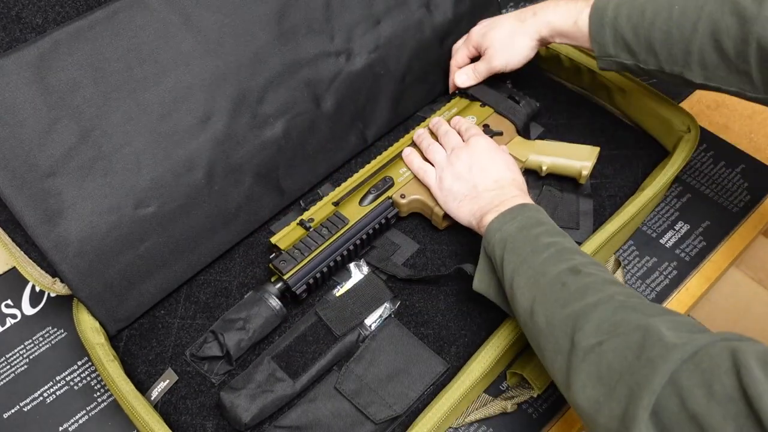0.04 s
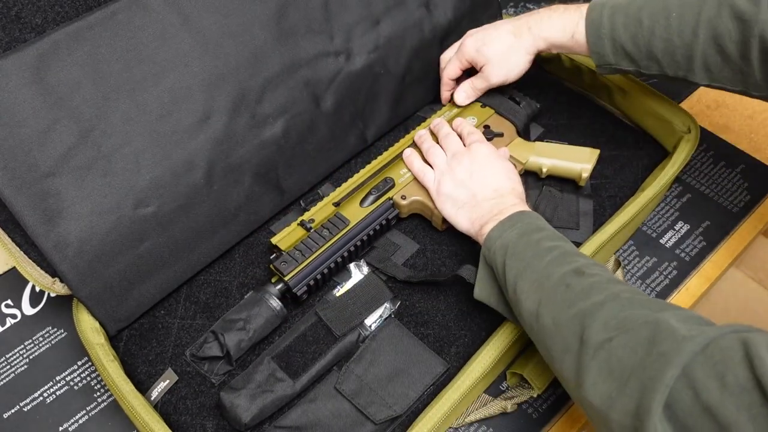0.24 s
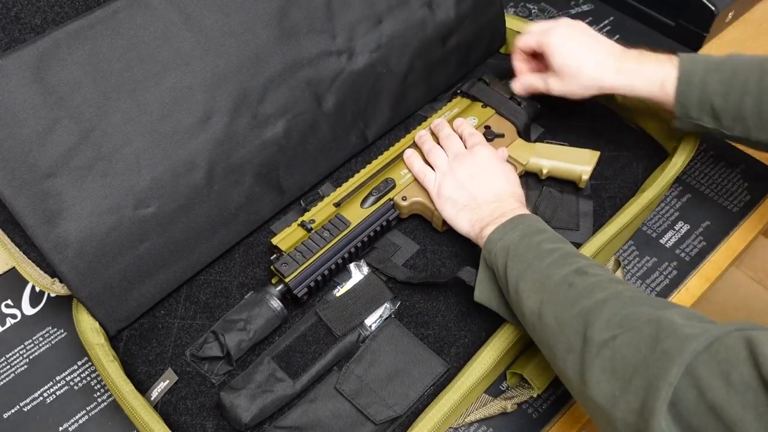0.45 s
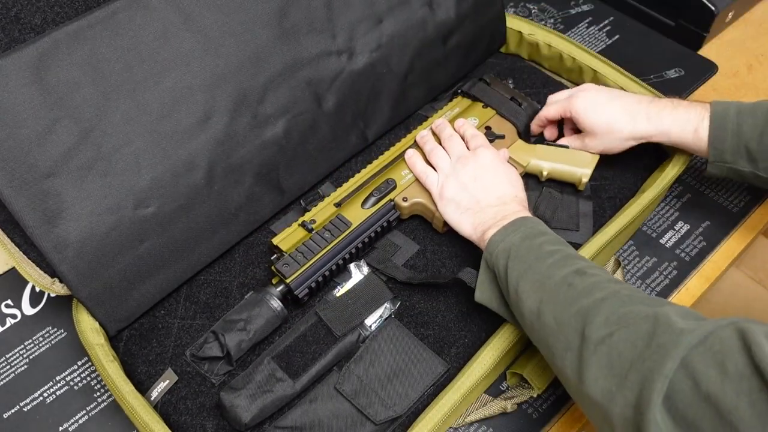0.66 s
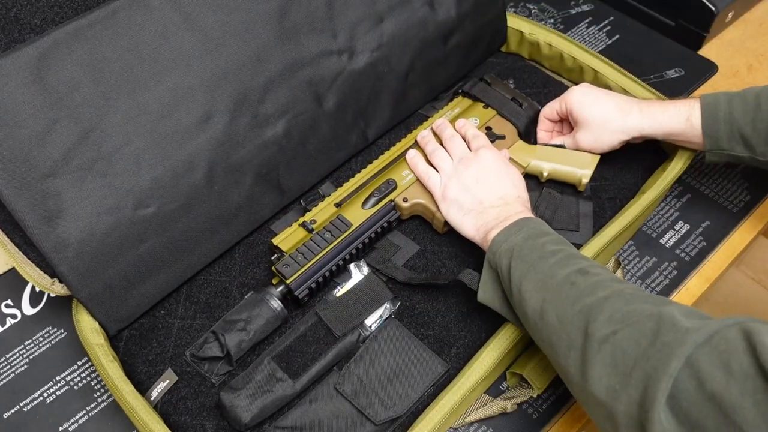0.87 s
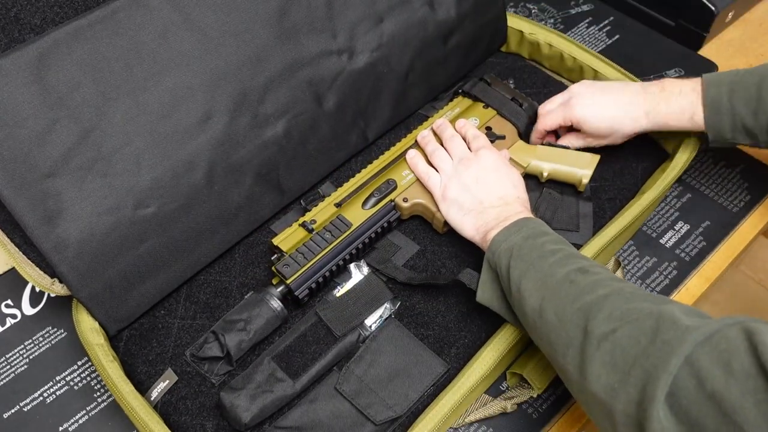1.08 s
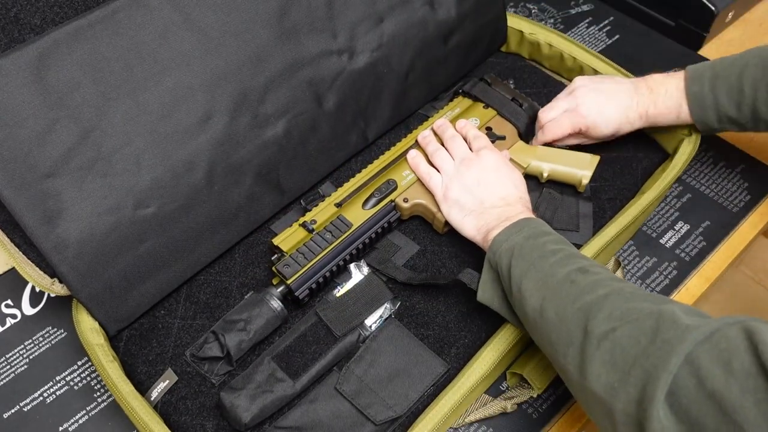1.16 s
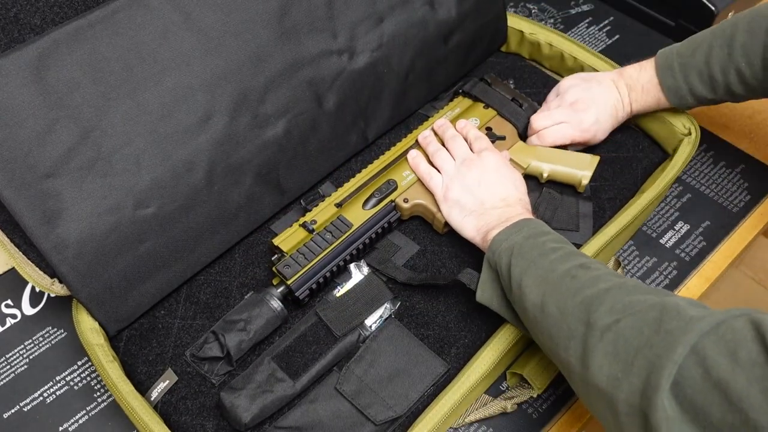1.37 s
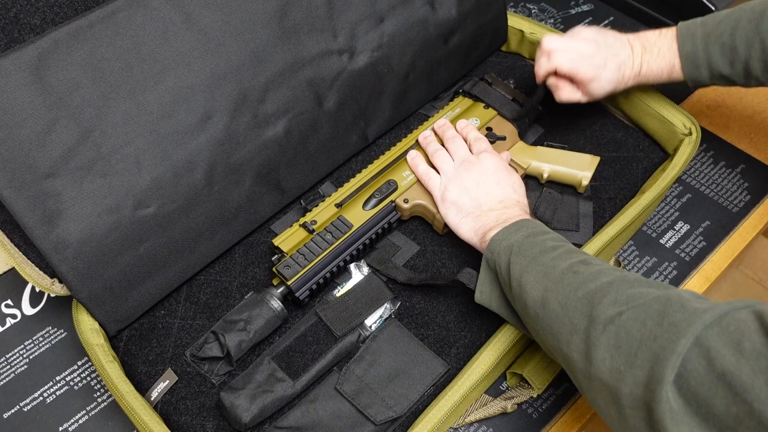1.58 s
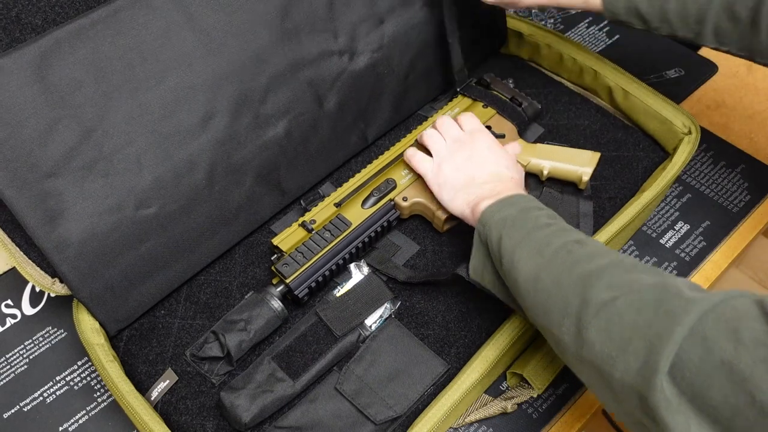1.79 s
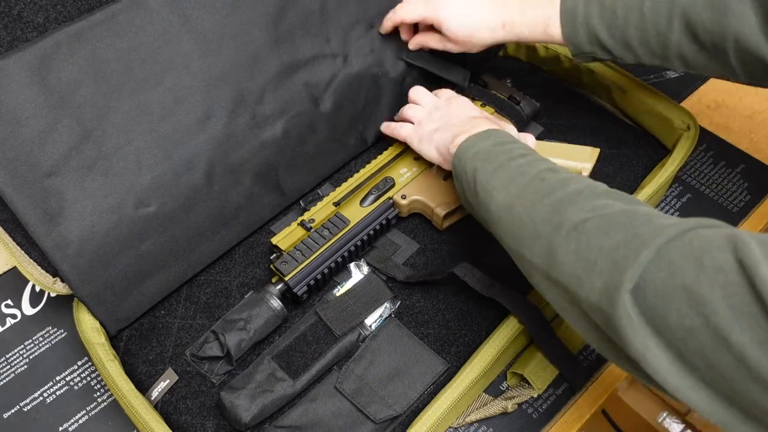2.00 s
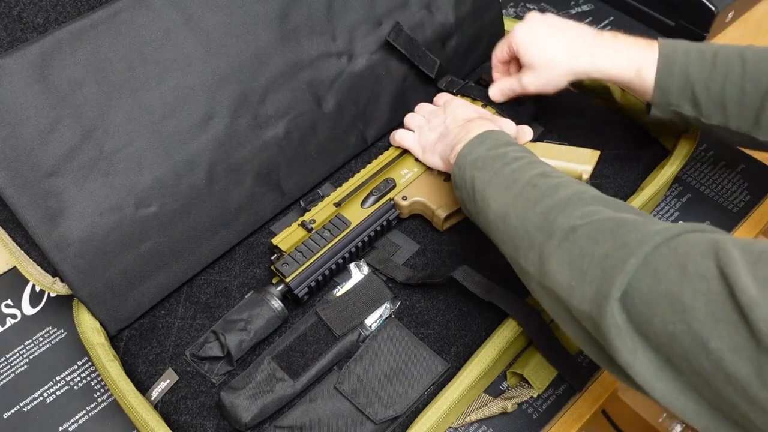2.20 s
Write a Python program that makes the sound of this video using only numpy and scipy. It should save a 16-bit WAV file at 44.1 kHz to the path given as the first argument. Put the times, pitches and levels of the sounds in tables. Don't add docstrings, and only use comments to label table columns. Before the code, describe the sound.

Close to a small camera indoors, hands tap and rub a padded nylon case, pull a hook-and-loop strap apart in uneven crunchy bursts, tear it loose loudly, then scrape the weave and rip again briefly.

```python
import sys
import numpy as np
from scipy import signal
from scipy.fft import rfft, irfft, next_fast_len
from scipy.io import wavfile
from scipy.ndimage import uniform_filter1d, map_coordinates

SR = 44100
rng = np.random.default_rng(int(sys.argv[2]) if len(sys.argv) > 2 else 0)


def linear_from_db(decibels):
    return 10 ** (np.asarray(decibels, float) / 20)


def pcm_store(signal):
    levels = np.round(np.clip(np.atleast_2d(signal), -1, 1) * 32767)
    wavfile.write(sys.argv[1], SR, levels.astype(np.int16).T)


N = 98960
T = np.arange(N) / SR

# (frequency [Hz], width [Hz], level [dB])
HOOKS = [(4120, 1960, 1), (6205, 1400, 0.5), (9480, 3400, -2.5), (13500, 2600, -9.5)]
# (frequency [Hz], width [Hz], level [dB])
PADDING = [(149, 100, -11.5), (396, 390, -3.5), (750, 474, 2), (1250, 330, -1), (1530, 690, 0),
           (2600, 2140, -19.5)]
# (time [s], rustle level [dB], padding rumble level [dB])
HANDLING = [(0, -52.5, -41.5), (.17, -39.5, -32.5), (.23, -39.5, -36.5), (.27, -50.5, -39),
            (.525, -51.5, -49), (.61, -61, -47), (.8, -47, -42.5), (.88, -36, -37), (1.0, -41.5, -53),
            (1.07, -41.5, -40.5), (1.18, -42, -37.5), (1.3, -43, -27), (1.4, -46, -49), (1.49, -42, -45),
            (1.72, -29, -32.5), (1.88, -46, -49.5), (2.03, -34.5, -34.5), (2.24, -56, -42)]
# (frequency [Hz], level per Hz [dB])
RUB = [(100, -17.5), (380, -0.5), (750, -4), (1400, -6.5), (2100, -16), (4500, -34)]


def unit(x):
    return x / np.sqrt(np.mean(x ** 2) + 1e-20)


def curve(rows, col):
    rows = np.array(rows)
    return np.interp(T, rows[:, 0], rows[:, col])


def wobble(count):
    return map_coordinates(rng.standard_normal(count * N // SR + 4), [T * count])


def filtered(x, response):
    m = next_fast_len(N + 8192)
    return irfft(rfft(x, m) * response(np.fft.rfftfreq(m, 1 / SR)), m)[:N]


def coloured(x, points):
    f, level = np.transpose(points)
    return unit(filtered(x, lambda hz: linear_from_db(np.interp(np.log(hz + 1), np.log(f), level))))


def grains(rate, spread_db):
    on = rng.random(N) < rate / SR
    size = linear_from_db(spread_db * np.minimum(rng.exponential(size=N), 3))
    return on * size * rng.standard_normal(N)


def ringing(clicks, body, scatter_db, burst_s):
    m = next_fast_len(N + 4096)
    f = np.fft.rfftfreq(m, 1 / SR)
    at = np.flatnonzero(clicks > 1e-6)
    luck, noise = rng.standard_normal((2, N + len(body)))
    total = 0
    for k, (centre, width, db) in enumerate(body):
        hit = np.zeros(N)
        hit[at] = clicks[at] * linear_from_db(scatter_db * luck[at + k])
        decay = signal.lfilter([1], [1, -np.exp(-1 / (burst_s * SR))], hit)
        burst = decay * np.roll(noise, 999 * k)[:N]
        damping = 1j * f * width
        mode = damping / (centre * centre - f * f + damping)
        total = total + rfft(burst, m) * linear_from_db(db) * mode ** 2
    return irfft(total, m)[:N]


def swell(start, rise, hold, fall):
    times = [0, rise / 2, rise, rise + hold,
             rise + hold + fall / 2, rise + hold + fall, rise + hold + 2 * fall]
    return np.interp(T - start, times, [0.0032, 0.19, 0.85, 1.0, 0.0, 0.043, 0.0029])


def evened(x):
    span_s = 0.0126
    power = np.abs(uniform_filter1d(x ** 2, size=round(span_s * SR)))
    return unit(x / (power + 0.07) ** 0.52)


def air():
    # (frequency [Hz], level per Hz [dB])
    hum = [(20, -8), (50, 5), (110, -7), (250, -1.5), (500, -40)]
    return linear_from_db(-53.5) * coloured(rng.standard_normal(N), hum)


def handling():
    # (frequency [Hz], level per Hz [dB])
    rustle = [(1500, -5), (2500, -2.5), (3500, -10), (5700, -2), (9500, -9), (16000, -10)]
    scratch = coloured(rng.standard_normal(N) + 1.1 * grains(1500, spread_db=4.5), rustle)
    rub = coloured(rng.standard_normal(N) + 3 * grains(240, spread_db=2.5), RUB)
    stir_db = 2.42 * wobble(count=35)
    scratch_db = curve(HANDLING, 1) + stir_db
    rub_db = curve(HANDLING, 2) + stir_db + 0.31 * wobble(count=60)
    return linear_from_db(scratch_db) * scratch + linear_from_db(rub_db) * rub


def snaps():
    # (time [s], peak level [dB])
    stray = [
        (0.032, -23),
        (0.157, -16.5),
        (0.3614, -23),
        (0.5953, -20),
        (1.925, -25),
    ]
    # (time [s], peak level [dB])
    broad = [(0.0904, -16), (0.6402, -15), (0.6496, -24), (0.6995, -30), (0.7196, -27), (0.7227, -26),
             (0.7268, -16), (0.7311, -18), (0.8471, -9.5), (0.851, -13), (0.8559, -32), (0.9273, -19),
             (0.9339, -12.5), (0.9393, -21), (0.9796, -16.5), (1.0639, -10.5), (1.0708, -16), (1.0813, -21),
             (1.0901, -7), (1.1208, -19), (1.1705, -18.5), (1.2048, -18), (1.2127, -9.5), (1.2537, -6),
             (1.2612, -16.5), (1.2692, -17), (1.2756, -8), (1.2924, -8.5), (1.297, -18), (1.308, -31),
             (1.3156, -21), (1.3242, -8), (1.3303, -14), (1.3393, -18), (1.3468, -29), (1.3535, -16),
             (1.3612, -10), (1.366, -10), (1.3782, -16.5), (1.4274, -18), (1.4322, -20), (1.4468, -22),
             (1.4779, -18), (1.4939, -27), (1.5078, -18), (1.5111, -16), (1.5307, -21), (1.5429, -10),
             (1.5554, -19), (1.5614, -10.5), (1.5673, -22), (1.5708, -24)]
    # (time [s], peak level [dB])
    edge = [(.8639, -10), (.8699, -9), (.9723, -13.5), (1.0121, -16), (1.0327, -16), (1.2144, -1.5),
            (1.2248, 4), (1.2354, 0.5), (1.2392, 0), (1.2536, -3.5), (1.2586, -8), (1.5946, -13),
            (1.5976, -7), (1.6054, 0), (1.6089, 6), (1.6164, 5), (2.0414, -10.5), (2.0467, -4.5),
            (2.0542, -22), (2.0645, -8.5), (2.0703, -14)]
    delay_s, snap_db = 0.00055, 6
    taut_from_s, taut_to_s, crackle_db, crackle_rate = 0.85, 1.7, 1, 450

    clear = np.zeros(N)
    for rows, modes in ((broad, HOOKS), (edge, HOOKS[2:]), (stray, HOOKS[1:2])):
        train = np.zeros(N)
        for s, db in rows:
            train[round((s + delay_s) * SR)] = linear_from_db(db + snap_db)
        clear = clear + ringing(train, modes, scatter_db=0.0, burst_s=0.00062)
    taut = (T > taut_from_s) & (T < taut_to_s)
    clicks = np.abs(grains(crackle_rate, spread_db=2.5))
    loose = unit(ringing(clicks, HOOKS, scatter_db=3.5, burst_s=0.00029))
    return clear + taut * linear_from_db(curve(HANDLING, 1) + crackle_db) * loose


def taps():
    # (time [s], peak level [dB], pitch [Hz])
    touches = [(0.0903, -14, 610), (0.1, -13.5, 674), (.1165, -7.5, 707), (0.1386, -12, 623),
               (.354, -22.5, 312), (0.355, -19.5, 690), (0.626, -28, 146), (1.914, -32.5, 140),
               (.749, -16, 825), (1.699, -20, 130), (1.717, -13.5, 289), (2.138, -16.5, 546),
               (2.156, -26.5, 750), (2.189, -13, 567)]
    # (frequency [Hz], width [Hz], level [dB])
    nail = [(2450, 810, 1)]
    ring_cycles, longest_s = 11.7, 0.044
    sag, slap_db = 0.24, 5

    out, slap = np.zeros(N), np.zeros(N)
    for s, db, hz in touches:
        cycles = hz * np.arange(SR // 10) / SR
        decay = linear_from_db(db + 5 - 60 * cycles / min(ring_cycles, longest_s * hz))
        onset = 1 - np.exp(-1.5 * cycles)
        knock = decay * onset * np.sin(2 * np.pi * cycles * (1 + sag * np.exp(-cycles)))
        part = out[round(s * SR):][:len(knock)]
        part += knock[:len(part)]
        slap[round(s * SR)] = linear_from_db(db + slap_db - 10 * (s > 0.2))
    return out + ringing(slap, PADDING + nail, scatter_db=1.0, burst_s=0.00046)


def tugs():
    # (start [s], rise [s], fall [s]: silent halfway, rebound at its end, hooks level [dB], padding level [dB])
    pulls = [(.43, 0.011, 0.13, -41, -28.5), (0.624, 0.0066, 0.11, -30.5, -21.5),
             (0.684, 0.01, 0.13, -32, -18.5), (0.712, 0.017, .02, -22.5, -15),
             (0.812, 0.037, 0.07, -26, -13.5), (0.922, .012, 0.1, -37, -19),
             (1.036, 0.019, 0.16, -32.5, -26), (1.089, 0.0067, 0.34, -45, -30),
             (1.202, 0.0094, 0.17, -29, -19), (1.256, 0.0084, -0.03, -23, -10),
             (1.288, 0.006, 0.09, -24, -18), (1.323, 0.0033, 0.07, -28, -13.5),
             (1.344, 0.021, -0.03, -23, -16), (1.423, 0.0031, 0.04, -30, -16),
             (1.5, 0.037, 0.01, -45, -17.5), (1.543, 0.0053, 0.05, -33, -18.5),
             (1.554, .018, 0.0041, -37, -9.5), (1.453, 0.02, 0.53, -31.5, -34),
             (1.914, 0.0028, 0, -46.5, -24), (2.1, 0.011, -0.1, -30.5, -25.5),
             (2.186, 0.004, -0.4, -36, -24.5)]
    bed_db = -5
    clicks = np.abs(grains(1600, spread_db=1.5))
    hooks = evened(unit(ringing(clicks + 0.057, HOOKS, scatter_db=-4.0, burst_s=0.00032)))
    pad = evened(unit(ringing(clicks ** 0.97 + 0.065, PADDING, scatter_db=-1, burst_s=0.0001)))
    shapes = np.array([swell(s, rise, 0, fall) for s, rise, fall, _, _ in pulls])
    hook_db, pad_db = np.transpose(pulls)[-2:]
    return hooks * (linear_from_db(hook_db) @ shapes) + pad * (linear_from_db(pad_db + bed_db) @ shapes)


def zips():
    # (time [s], rib rate [Hz], level [dB])
    quick = [
        (0.432, 680, -37),
        (.435, 772, -24.5),
        (0.443, 888, -25.5),
        (0.446, 920, -31.5),
        (0.452, 976, -23),
        (0.467, 1130, -42),
    ]
    slow = [
        (1.95, 514, -36),
        (1.98, 483, -26),
        (1.998, 450.3, -20.5),
        (2.013, 560, -17),
        (2.03, 757, -21),
        (2.042, 724, -28),
    ]
    last = [
        (2.098, 604.6, -40.5),
        (2.105, 710, -19),
        (2.113, 985, -23),
        (2.121, 1210, -31),
    ]
    jitter, rough_db = 0.045, 2
    second_db, scrape_db, top_hz = -6.5, -5, 1350

    out = np.zeros(N)
    scrape = coloured(rng.standard_normal(N), RUB)
    for rows in (slow, quick, last):
        rib_hz = curve(rows, 1)
        phase = 2 * np.pi * np.cumsum(rib_hz * (1 + jitter * wobble(count=250))) / SR
        on = (T > rows[0][0]) & (T < rows[-1][0])
        second = linear_from_db(second_db + 3 * wobble(count=90)) * np.sin(2 * phase)
        second = second / (1 + (2 * rib_hz / top_hz) ** 10)
        tone = linear_from_db(5.0 + rough_db * wobble(count=200)) * np.sin(phase) + second
        out += on * linear_from_db(curve(rows, 2)) * (tone + linear_from_db(scrape_db) * scrape)
    return out


def jolts():
    # (time of peak [s], peak level [dB], pitch [Hz])
    blows = [(0.7106, -15, 1120), (0.7132, -15, 1250), (0.7212, -19, 1060), (0.7259, -9, 1600),
             (0.7288, -26, 1030), (0.8412, -12.5, 780), (0.8482, -11, 1000), (0.8515, -5, 1290),
             (0.8547, -7, 1270), (0.8589, -20, 1230), (0.9348, -14, 1350), (0.9384, -20, 1010),
             (0.9411, -13, 1340), (1.0913, -11, 1680), (1.0938, -13.5, 1304), (1.1006, -11.5, 1380),
             (1.2063, -9.5, 990), (1.2087, -1.5, 990), (1.2117, -13.5, 1050), (1.2153, -6.5, 1070),
             (1.2277, -12, 1440), (1.2424, -17, 1260), (1.2476, -17, 1160), (1.2549, -9.5, 1100),
             (1.262, -12, 990), (1.2654, -7.5, 1260), (1.2706, -9, 894), (1.2766, -14, 1270),
             (1.279, -11, 1490), (1.2879, -13, 920), (1.2944, -9, 1180), (1.3181, -15, 1210),
             (1.3268, -7.5, 980), (1.3324, -16, 1150), (1.3363, -21, 1110), (1.3409, -12, 850),
             (1.344, -18, 1040), (1.3474, -10.5, 826), (1.3544, -12, 1320), (1.3573, -12, 1140),
             (1.36, -11, 770), (1.363, -4.5, 1200), (1.367, -5.5, 1190), (1.3718, -15, 1250),
             (1.3792, -16, 1180), (1.4258, -9, 1250), (1.4298, -1, 1370), (1.4354, -13.5, 1360),
             (1.4477, -13, 1280), (1.5256, -11, 1247), (1.5343, -15, 1210), (1.5437, -5.5, 1280),
             (1.5484, -7, 1090), (1.5564, 0, 1240), (1.5592, -7, 1170), (1.5638, -8, 960),
             (1.5667, -6, 1080), (1.5694, -5, 955), (1.5737, -5, 970), (1.5775, -15, 1130)]
    rise_cycles, jolt_db, rattle_db = 0.8, -0.5, 5
    low_cut_hz = 354

    out, kick = np.zeros((2, N))
    for s, db, hz in blows:
        cycles = hz * np.arange(SR // 100) / SR
        u = cycles / rise_cycles
        at = round((s - rise_cycles / hz) * SR)
        out[at:at + len(u)] += linear_from_db(db + jolt_db) * u * np.exp(1 - u) * np.sin(2 * np.pi * cycles)
        kick[at] = linear_from_db(db + rattle_db)
    wall = filtered(out, lambda f: (f / (f - 1j * low_cut_hz)) ** 2)
    return wall + ringing(kick, PADDING[2:], scatter_db=4.5, burst_s=0.00034)


def rips():
    # (start [s], attack [s], hold [s], hooks level [dB], padding level [dB])
    pulls = [
        (1.607, 0.011, 0.081, -14.5, -21),
        (2.038, 0.021, 0.013, -21, -27.5),
    ]
    # (frequency [Hz], level per Hz [dB])
    tear_colour = [(1180, -26), (2000, -15), (4240, -13), (5770, -1.5), (7450, -7.5), (9980, -1),
                   (15100, -13), (16100, -8.5), (16500, -57)]
    pad_colour = [(100, -49), (280, -6.5), (800, -0.5), (1200, -12.5), (4000, -24)]
    release_s = 0.007

    grit = linear_from_db(2.2 * wobble(count=400))
    tear = unit(grit * coloured(grains(7000, spread_db=2.5), tear_colour))
    pad = coloured(rng.standard_normal(N), pad_colour)
    out = np.zeros(N)
    for s, rise, hold, db, pad_db in pulls:
        out += swell(s, rise, hold, release_s) * (linear_from_db(db) * tear + linear_from_db(pad_db) * pad)
    return out


def room(x):
    # (frequency [Hz], 60 dB decay time [s])
    decay = [(200, 0.4), (2000, 0.35), (12000, 0.26)]
    hz, t, z = signal.stft(rng.standard_normal(SR // 2), SR, nperseg=256)
    f, t60 = np.transpose(decay)
    t60 = np.interp(np.log(hz + 1), np.log(f), t60)[:, None]
    tail = signal.istft(z * linear_from_db(-60 * t / t60), SR, nperseg=256)[1]
    delayed = np.pad(x, (200, 0))
    return signal.fftconvolve(delayed, tail / np.linalg.norm(tail))[:N]


def scene():
    near = tugs() + rips() + snaps() + jolts() + taps() + zips()
    return (near + linear_from_db(-13.5) * room(near) + handling() + air())[None]


def top_cut(x):
    return signal.sosfilt(signal.butter(12, 17000, fs=SR, output="sos"), x)


def record(dry):
    x = dry / (1 + np.abs(dry / 0.74) ** 4) ** (1 / 4)
    x = filtered(x[0], lambda hz: hz < 16000)[None]
    return top_cut(x)


dry = scene()
out = record(dry)
pcm_store(out)
```